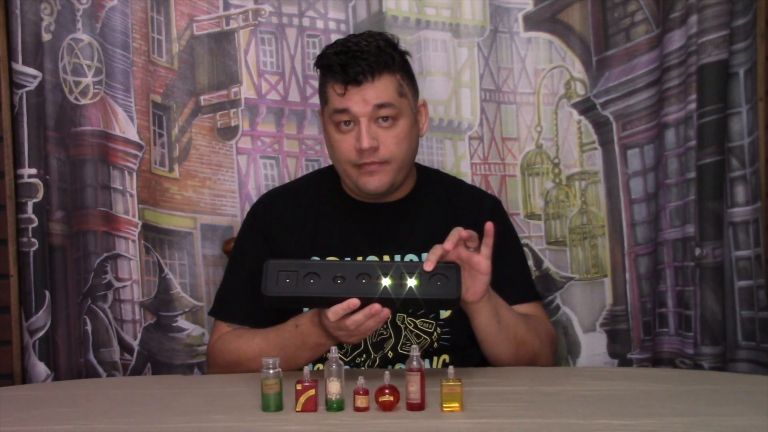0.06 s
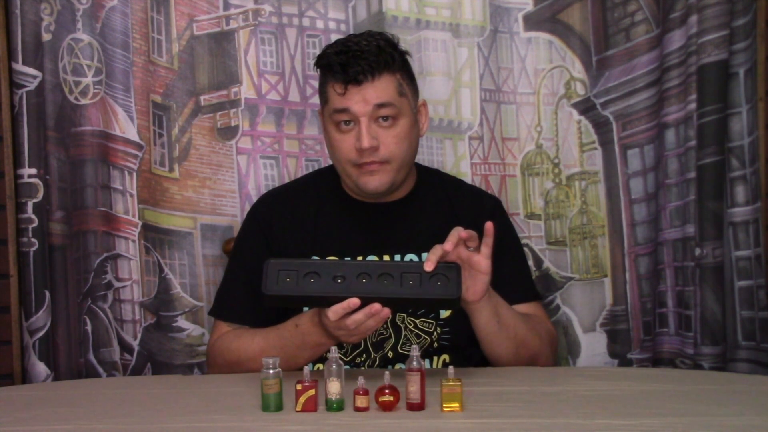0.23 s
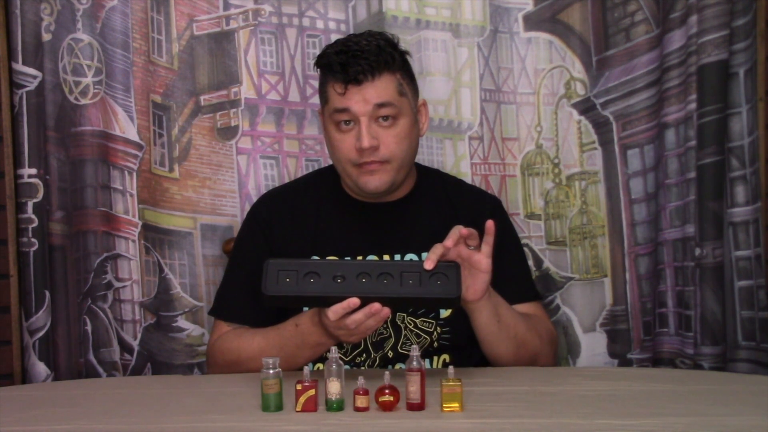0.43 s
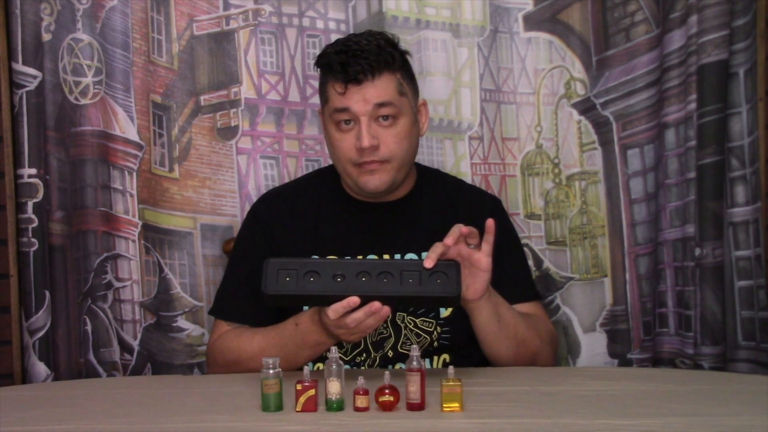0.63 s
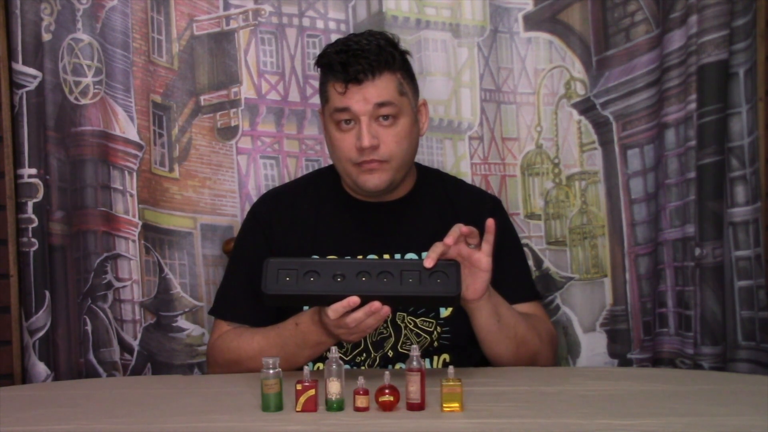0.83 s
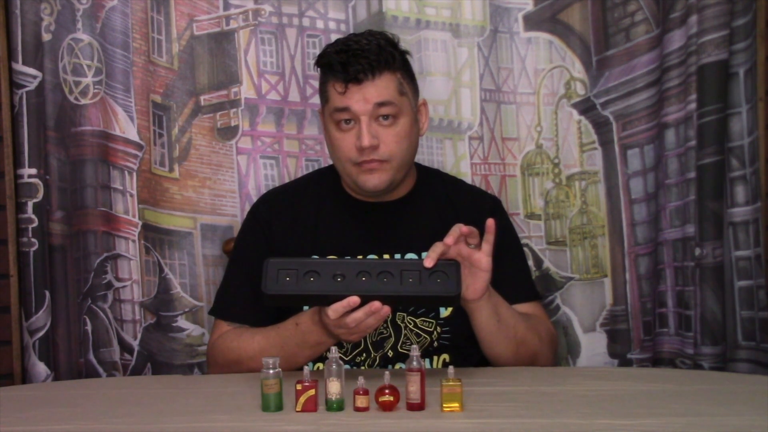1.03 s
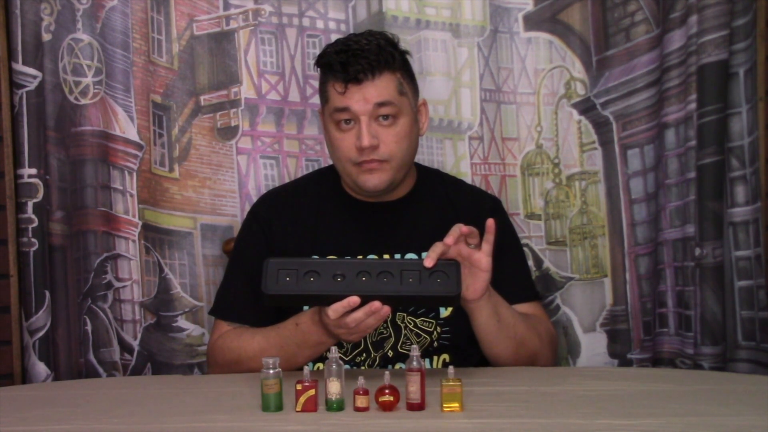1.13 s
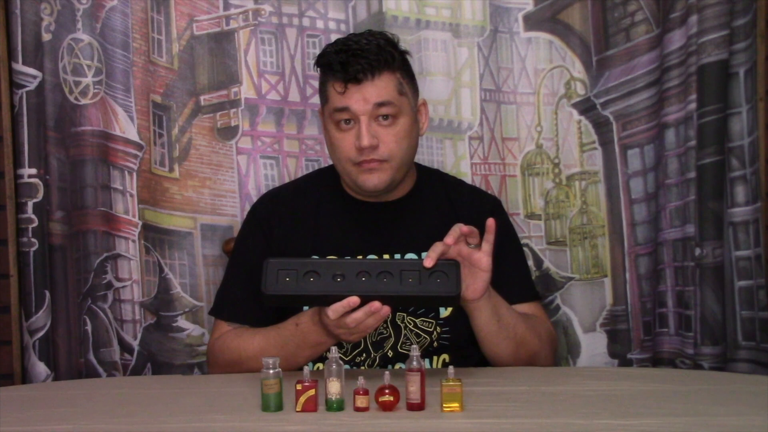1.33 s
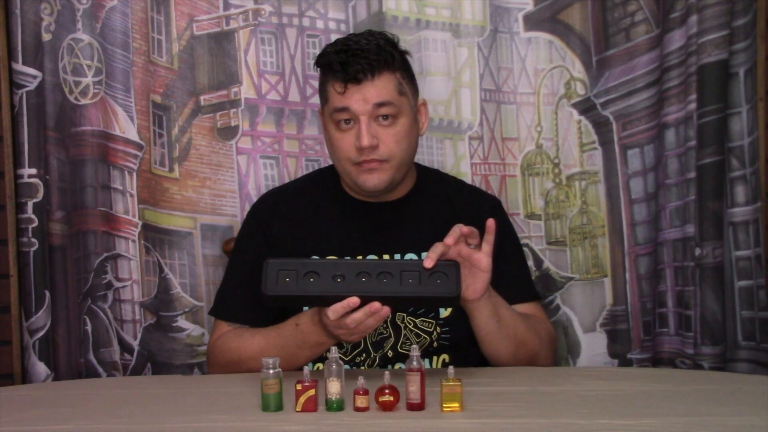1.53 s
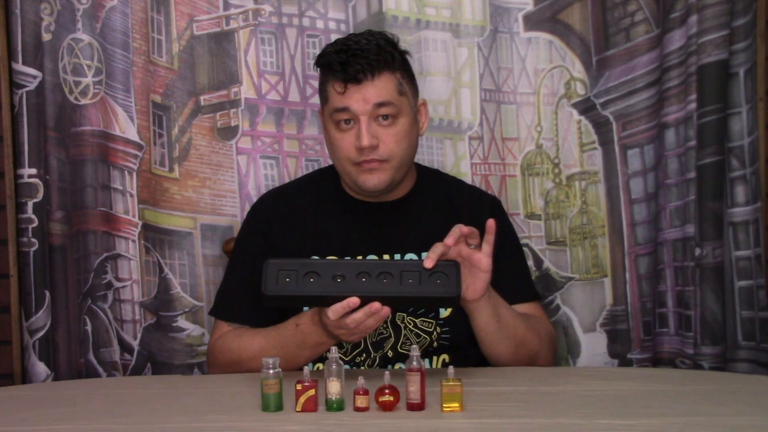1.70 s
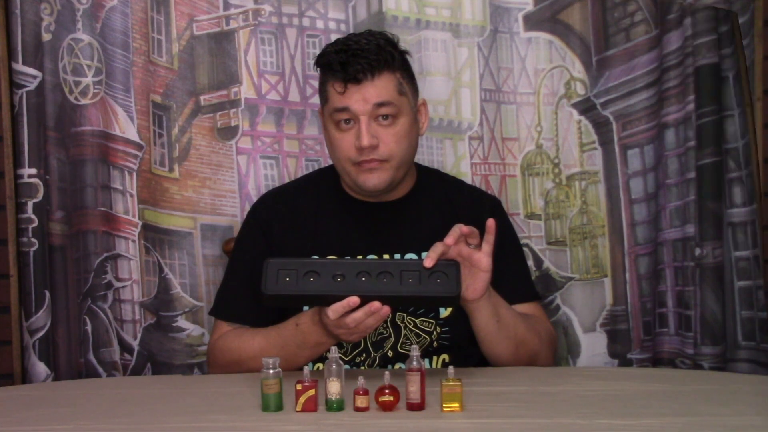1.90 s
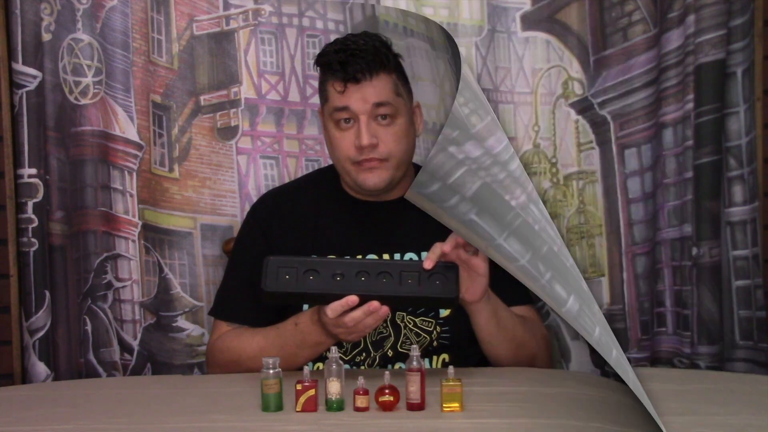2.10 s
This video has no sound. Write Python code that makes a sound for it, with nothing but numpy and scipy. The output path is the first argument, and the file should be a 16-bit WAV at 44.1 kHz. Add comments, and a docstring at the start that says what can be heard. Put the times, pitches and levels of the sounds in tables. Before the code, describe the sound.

Two quick button clicks on a hollow plastic casing, loud then softer, over faint room hiss

```python
"""Hiss, low rumble, mains hum and a thin whine, nearly mono, run throughout as shaped noise and sines.
At 0.20 s a small plastic push button on a hollow lamp base snaps in; at 0.36 s it snaps back out, softer.
Each snap is a blow with quick rebounds that rings the plastic casing; table and walls of a small room
answer with smeared echoes and a diffuse tail. At the end the background sinks a little."""
import sys
import numpy as np
from scipy import signal
from scipy.fft import rfft, irfft, next_fast_len
from scipy.io import wavfile
from scipy.ndimage import uniform_filter1d, map_coordinates

SR = 44100
rng = np.random.default_rng(int(sys.argv[2]) if len(sys.argv) > 2 else 0)


def elevation(decibels):
    """Turn decibel levels (scalar or array-like) into linear amplitude ratios."""
    levels = np.asarray(decibels, float)
    return 10 ** (levels / 20)


def bounce(signal):
    """Save signal as a 16-bit WAV file at the path given by the first command-line argument."""
    frames = np.transpose(np.atleast_2d(signal))
    limited = np.clip(frames, -1, 1)
    pcm = np.round(limited * 32767).astype(np.int16)
    wavfile.write(sys.argv[1], SR, pcm)


N = 94815

# Rumble and hiss spectrum. Each row: frequency in Hz, relative density in dB per Hz.
AIR_SPECTRUM_HZ_DB = [(12, -37), (20, 2), (107, -2), (145, -3.5), (186, -6), (325, -11), (354, -11.5),
                      (385, -12.5), (523, -14), (568, -15), (772, -16.5), (1640, -22), (6080, -26),
                      (7390, -24.5), (10300, -29), (11900, -29.5), (15700, -21)]
# Channel difference. Each row: frequency in Hz, gain in dB relative to the air common to both channels.
SIDE_GAIN_HZ_DB = [(20, -38), (200, -36), (400, -25), (1000, -27), (3000, -24), (6000, -34.5), (16000, -35)]
# Mains hum, before the background level curve. Each row: frequency in Hz, rms level in dB, wander in Hz.
HUM_HZ_DB_HZ = [(54.8, -61.5, 2.8), (121.3, -64, 1.63), (360.7, -66, 1.51)]
# Thin whine, before the background level curve. One row: frequency in Hz, rms level in dB, wander in Hz.
WHINE_HZ_DB_HZ = (12247, -69.5, 6)
# Background level curve. Each row: time in seconds, gain in dB.
AIR_LEVEL_S_DB = [(0, 0), (.2, -1.5), (.33, -0.5), (.5, -0.5), (1.3, 0), (1.9, -1), (2.05, -2.5),
                  (2.15, -4)]
# Room decay. Each row: frequency in Hz, t60 in seconds.
ROOM_HZ_T60_S = [(400, 0.27), (1000, 0.22), (2800, 0.21), (7000, 0.18), (11000, 0.16), (15000, 0.093)]
# Early echoes off table and walls. Each row: delay in seconds, relative energy in dB.
ECHOES_S_DB = [(.0032, -12), (.0042, -10), (.0058, -11), (.0105, -10), (.0145, -14)]
# Casing resonances, before FOCUS. Each row: frequency in Hz, width in Hz, relative level in dB.
CASING_HZ_HZ_DB = [(296, 28, -5), (692, 110, -0.5), (1294, 58, -10.5), (1580, 670, -2), (2755, 500, -6.5),
                   (4150, 560, -3.5), (4910, 400, -3), (5530, 300, -6), (7000, 650, -7.5),
                   (8190, 1000, -4.5), (9230, 440, -5.5), (10080, 550, -5), (11300, 250, -11),
                   (13900, 2000, -41)]
# Long-lived casing modes, before the snap's colour. Each row: frequency in Hz,
# level in dB relative to the direct peak, t60 in seconds.
RING_HZ_DB_S = [(634, -25, 0.064), (678, -23.5, 0.06), (722, -30, 0.16), (1353, -30, 0.041),
                (1554, -34, 0.14), (1847, -46, 0.06), (2727, -25, 0.1), (4000, -13, 0.056),
                (7370, -9.5, 0.027)]
# Snap in, snap out. Each row: peak of the direct sound in dB, then, before FOCUS: brightness in dB
# per octave, casing boom in dB, top edge in dB.
SNAPS = [(-3.5, -1, -2, -9.5), (-11.5, .5, 6, 7)]
# Contacts. Each row: start in seconds, rebound spacing in seconds, level step per rebound in dB.
CONTACTS_S_S_DB = [(.20458, .00027, -2.5), (.36315, .00024, -2)]
# Band limit. Each row: frequency in Hz, gain in dB.
TOP_HZ_DB = [(20, 0), (15700, 0), (15800, -26), (16400, -42), (16700, -55), (22000, -60)]

AIR_DB = -45.5  # rms before the sway and the level curve
RUMBLE_SWAY_DB, RUMBLE_TOP_HZ = 3, 313
ECHO_SMEAR_S = 0.00091  # rough surfaces spread each echo
DIFFUSE_DB, ROOM_BUILD_S = -1, 0.00033  # diffuse tail on the echoes' scale; time to fill in
EVEN_BINS = 210  # spectral smoothing width, bins of 2 Hz
BOOM_BELOW_HZ = 1000  # boom lifts modes below this
SCATTER_DB = 2.5  # chance level change of a mode per snap, before FOCUS
RADIATES_HZ, EDGE_HZ = 350, 12300  # small casing radiates little below; top edge lies above
FOCUS = 1.34  # exponent: strong resonances stand out more in the direct sound than in the room
ROOM_DB = 5.5  # room energy over the direct sound
RING_ATTACK_S = 0.0015


def unit(x):
    """Scale to rms 1."""
    return x / np.sqrt(np.mean(x ** 2) + 1e-20)


def along(points, hz):
    """(Hz, value) points read on a log axis."""
    f, v = np.transpose(points)
    return np.interp(np.log(hz + 1), np.log(f + 1), v)


def wobble(knots_per_s):
    """Smooth random curve through normal knots."""
    knots = rng.standard_normal(int(N * knots_per_s / SR) + 4)
    return map_coordinates(knots, [np.arange(N) * knots_per_s / SR])


def filtered(x, response):
    """x times a complex response of frequency."""
    m = 2 * next_fast_len(x.shape[-1] // 2 + 4096)
    spectrum = rfft(x, m) * response(np.fft.rfftfreq(m, 1 / SR))
    return irfft(spectrum, m)[..., :x.shape[-1]]


def causal(gain):
    """Minimum-phase response with this gain on the FFT grid, by folding the cepstrum."""
    c = irfft(np.log(gain + 1e-6))
    c[1:len(c) // 2] *= 2
    c[len(c) // 2 + 1:] = 0
    return np.exp(rfft(c))


def hiss_and_rumble():
    """Shaped noise with swaying lows; a trace of it differs between the channels."""
    # without its last row the spectrum holds level at the top
    mid = filtered(rng.standard_normal(N), lambda hz: elevation(along(AIR_SPECTRUM_HZ_DB[:-1], hz)))
    mid = unit(mid)
    low = filtered(mid, lambda hz: 1 / (1 + (hz / RUMBLE_TOP_HZ) ** 2))
    mid = mid + low * (elevation(RUMBLE_SWAY_DB * wobble(5.62)) - 1)
    side = filtered(rng.standard_normal(N), lambda hz: elevation(along(AIR_SPECTRUM_HZ_DB, hz)))
    side = filtered(unit(side), lambda hz: elevation(along(SIDE_GAIN_HZ_DB, hz)))
    return elevation(AIR_DB) * np.array([mid + side, mid - side])


def hum_and_whine():
    """Faint sines, each wandering in frequency."""
    out = np.zeros(N)
    for hz, rms_db, wander_hz in [*HUM_HZ_DB_HZ, WHINE_HZ_DB_HZ]:
        cycles = np.cumsum(hz + wander_hz * wobble(8.14)) / SR
        out += elevation(rms_db) * np.sqrt(2) * np.sin(2 * np.pi * cycles)
    return out


def air():
    """Whole background under one slow level curve."""
    level = elevation(np.interp(np.arange(N) / SR, *np.transpose(AIR_LEVEL_S_DB)))
    return level * (hiss_and_rumble() + hum_and_whine())


def room():
    """Smeared early echoes on a diffuse tail that dies faster in the treble; broad colour evened out."""
    hz, t, z = signal.stft(rng.standard_normal(SR // 2), SR, nperseg=128)
    decay = elevation(-60 * t / along(ROOM_HZ_T60_S, hz)[:, None])
    tail = signal.istft(z * decay, SR, nperseg=128)[1][:SR // 2]
    t = np.arange(len(tail)) / SR
    build = 1 - np.exp(-t / ROOM_BUILD_S)
    tail = elevation(DIFFUSE_DB) * tail * build / np.linalg.norm(tail)
    shape = sum(elevation(db) * (t >= s) * np.exp(-np.abs(t - s) / ECHO_SMEAR_S) for s, db in ECHOES_S_DB)
    echoes = shape * rng.standard_normal(len(t)) / np.sqrt(ECHO_SMEAR_S * SR / 2)
    answer = rfft(tail + echoes)
    broad_power = np.abs(uniform_filter1d(np.abs(answer) ** 2, EVEN_BINS))
    return irfft(answer * causal(1 / np.sqrt(broad_power)))


def snap(peak_db, tilt_db, boom_db, edge_db, rebound_s, rebound_db):
    """Blow and four rebounds excite the casing; heard directly, through the room and as a ring."""
    t = np.arange(SR // 2) / SR
    hits = np.arange(5)
    blow = np.zeros(len(t))
    blow[np.round(hits * rebound_s * SR).astype(int)] = elevation(hits * rebound_db)

    def colour_db(hz):
        return tilt_db * np.log2(hz / 4000) + boom_db * (hz < BOOM_BELOW_HZ)

    scatter_db = SCATTER_DB * rng.standard_normal(len(CASING_HZ_HZ_DB))
    modes = [(c, w, elevation(db + up + colour_db(c))) for (c, w, db), up in zip(CASING_HZ_HZ_DB, scatter_db)]

    def body(f):
        radiation = f ** 2 / (f ** 2 + RADIATES_HZ ** 2)
        edge = elevation(edge_db / (1 + (EDGE_HZ / (f + 1)) ** 12))
        power = sum((g * f * w) ** 2 / ((c * c - f * f) ** 2 + (f * w) ** 2) for c, w, g in modes)
        return radiation * edge * np.sqrt(power)

    direct = filtered(blow, lambda f: causal(body(f) ** FOCUS))
    spread = filtered(room(), lambda f: causal(body(f)))
    spread = spread * elevation(ROOM_DB) * np.linalg.norm(direct) / np.linalg.norm(spread)
    ring = np.zeros(len(t))
    for hz, db, t60_s in RING_HZ_DB_S:
        ring += elevation(db + colour_db(hz) - 60 * t / t60_s) * np.sin(2 * np.pi * hz * t)
    ring = ring * (1 - np.exp(-t / RING_ATTACK_S))
    return elevation(peak_db) * ((direct + spread) / np.abs(direct).max() + ring)


def button():
    """Both snaps at their moments."""
    out = np.zeros(N + SR)
    for how, (start_s, *rebounds) in zip(SNAPS, CONTACTS_S_S_DB):
        heard = snap(*how, *rebounds)
        out[round(start_s * SR):][:len(heard)] += heard
    return out[:N]


def scene():
    """Button in the middle, over the room's air."""
    return air() + button()


def top_cut(x):
    """Nothing passes above the cut-off."""
    return signal.sosfilt(signal.butter(12, 16640, fs=SR, output="sos"), x)


def record(dry):
    """Band-limits the treble and returns the finished sound."""
    mix = filtered(dry, lambda hz: elevation(along(TOP_HZ_DB, hz)))
    return top_cut(mix)


dry = scene()
out = record(dry)
bounce(out)
```